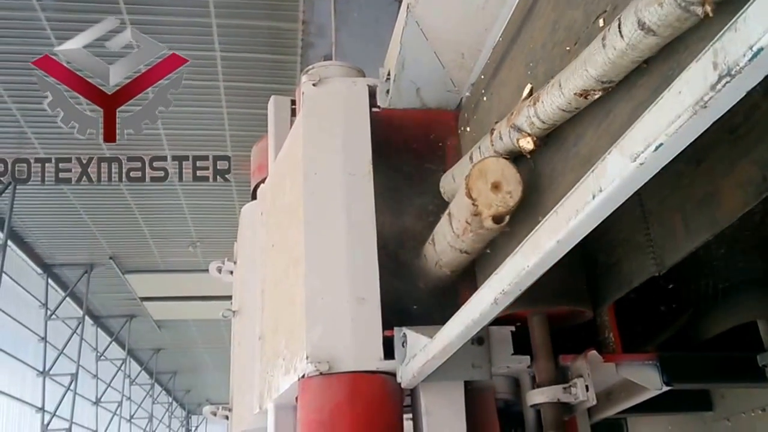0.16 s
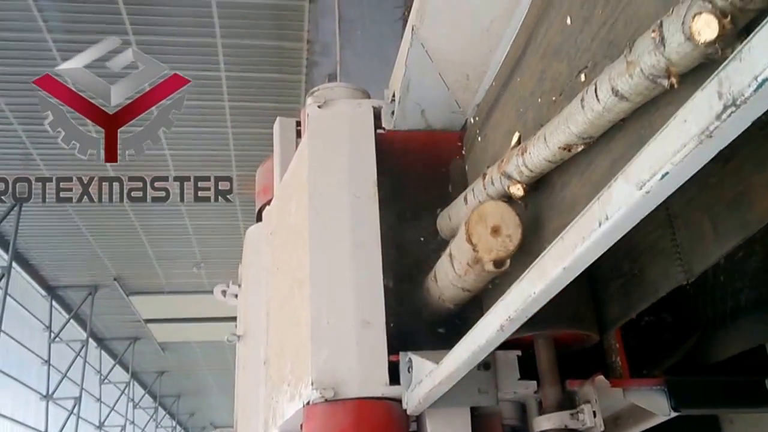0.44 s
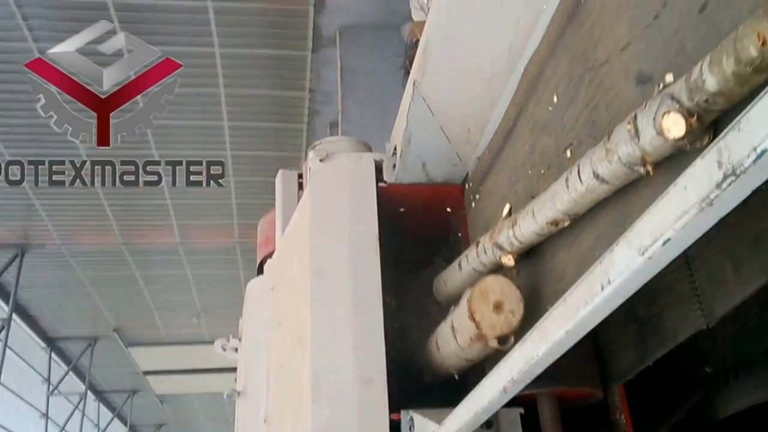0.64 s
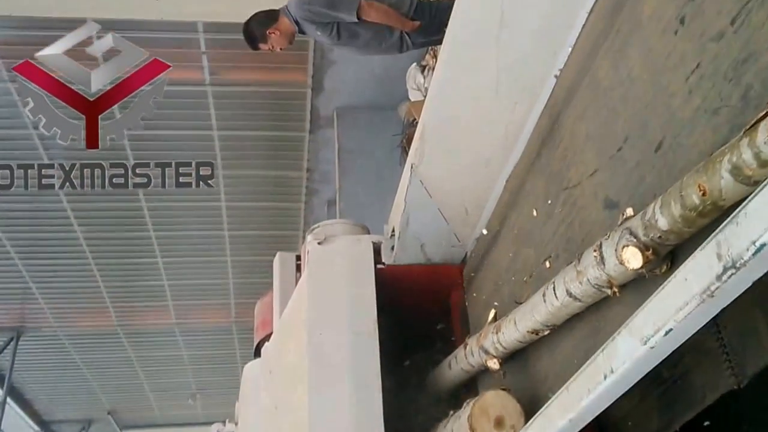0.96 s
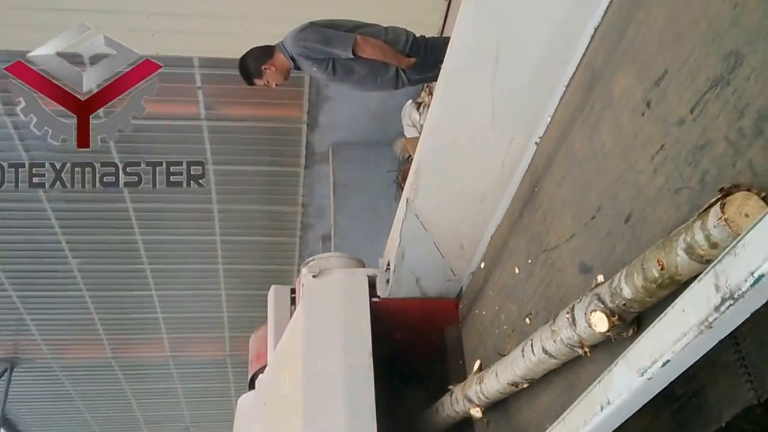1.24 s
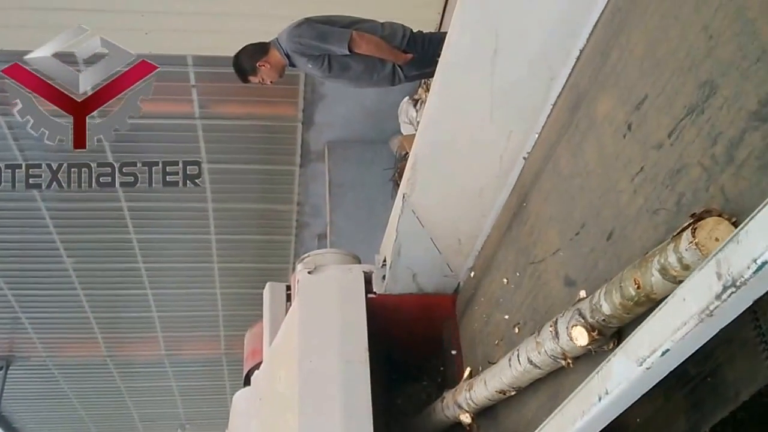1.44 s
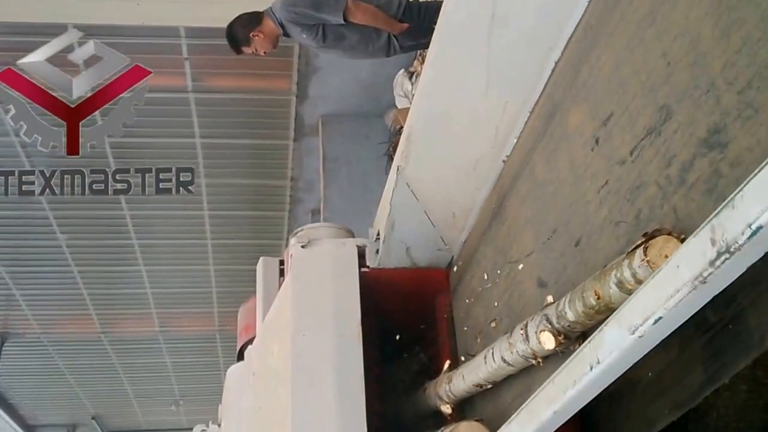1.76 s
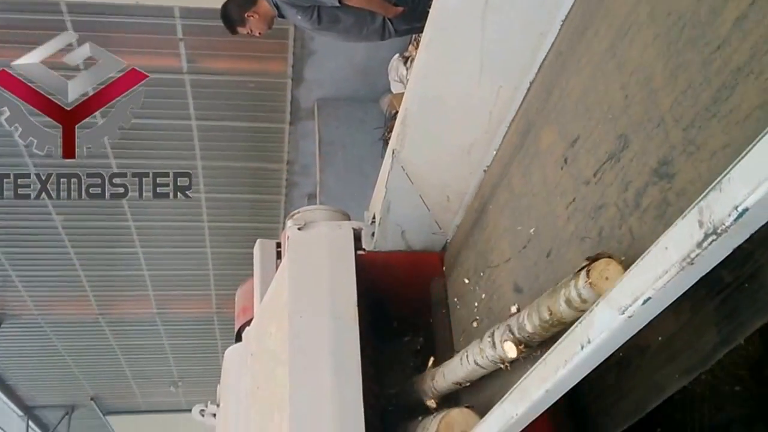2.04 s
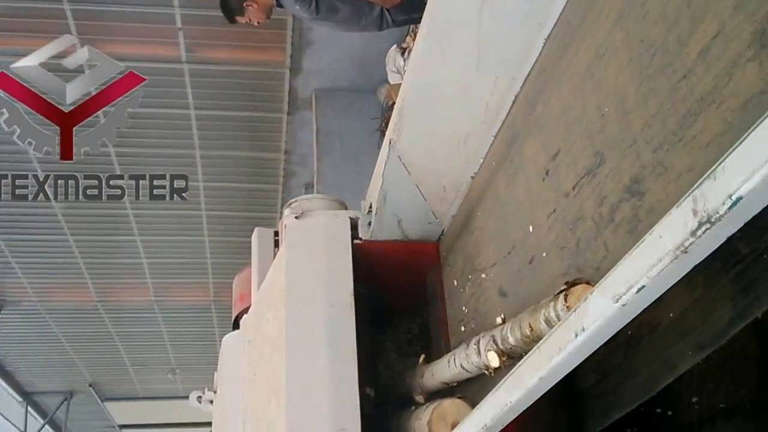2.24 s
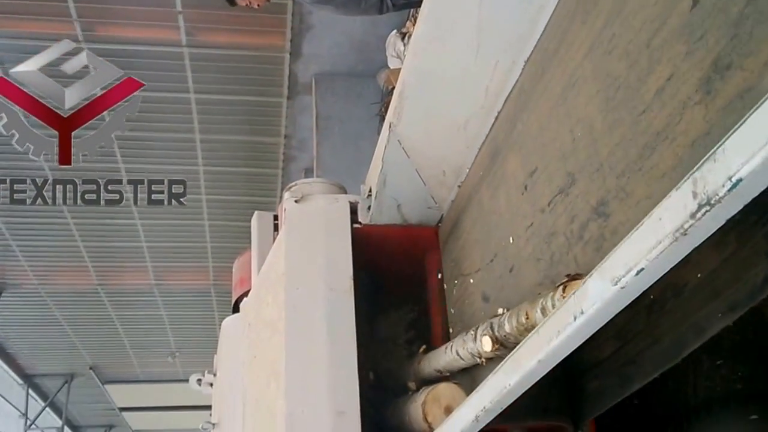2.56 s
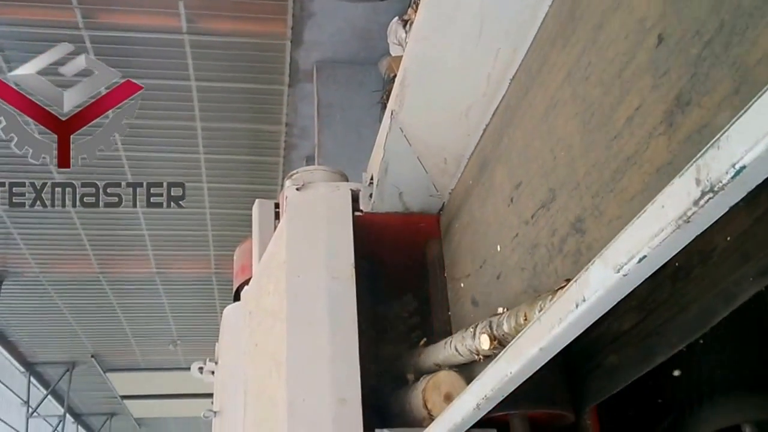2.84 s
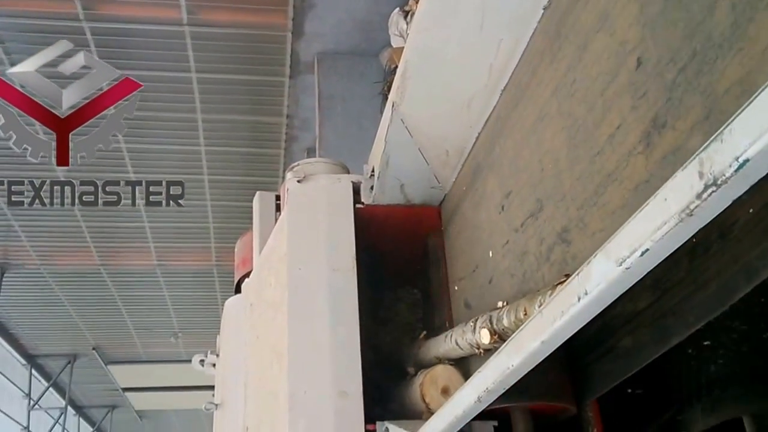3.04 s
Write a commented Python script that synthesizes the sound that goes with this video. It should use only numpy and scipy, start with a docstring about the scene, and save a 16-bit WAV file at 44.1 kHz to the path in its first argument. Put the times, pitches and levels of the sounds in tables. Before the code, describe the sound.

A large wood chipper is already grinding at 0 s and never stops until about 3.2 s. Rapid knife chatter, around 36 cuts a second, makes logs ring in wandering hollow tones over broad roar, low motor hum and hiss. Chip sprays rattle on steel about every tenth of a second; from 0.4 s logs knock dully, densest around 1.3-2 s. Close, treble-limited microphone, slight hall reverberation.

```python
"""A drum wood chipper in a large hall, heard through a small mono microphone whose response falls off steeply
above 7.75 kHz, with a flickering width in the treble. From the start logs ring as wandering resonances under
four knives a turn, over roar, motor hum and chip hiss (shaped noise and a sine). At once sprays of chips, dense
noise ticks, begin to strike steel; from about 0.4 s heavy knocks sound, short tone swells with dull cracks,
many of them once a drum turn. The logs stand well above the hall's answer."""
import sys
import numpy as np
from scipy import signal
from scipy.fft import rfft, irfft, next_fast_len
from scipy.io import wavfile
from scipy.ndimage import uniform_filter1d, map_coordinates

SR = 44100
rng = np.random.default_rng(int(sys.argv[2]) if len(sys.argv) > 2 else 0)


def store_pcm(level_fs):
    """Save levels as 16-bit WAV."""
    pcm = np.round(np.clip(level_fs, -1, 1) * 32767).astype(np.int16)
    wavfile.write(sys.argv[1], SR, np.atleast_2d(pcm).T)


N = 141561
T = np.arange(N) / SR


def amp(db):
    """dB to gain."""
    return 10 ** (np.asarray(db) / 20)


def unit(x):
    """Scale to rms 1."""
    return x / np.sqrt(np.mean(x ** 2) + 1e-20)


def level_curve(rows):
    """Straight lines through (time [s], level [dB]) rows, one value per sample."""
    times, levels = np.transpose(rows)
    return np.interp(T, times, levels)


def wobble(rate):
    """A smooth random curve, rate knots a second."""
    knots = rng.standard_normal(int(N * rate / SR) + 4)
    return map_coordinates(knots, [T * rate])


def patches(hz, t, size_hz, size_s):
    """A smooth random field over frequency and time."""
    knots = rng.standard_normal((120, 200))
    return map_coordinates(knots, np.meshgrid(hz / size_hz, t / size_s, indexing="ij"))


def coloured(x, points):
    """Filter x through a (frequency [Hz], gain [dB]) curve, interpolated over log frequency."""
    m = next_fast_len(N + 8192)
    f, db = np.transpose(points)
    gain = amp(np.interp(np.log(np.fft.rfftfreq(m, 1 / SR) + 1), np.log(f + 1), db))
    return irfft(rfft(x, m) * gain, m)[:N]


def decayed(x, t60):
    """Each impulse of x becomes an exponential tail that falls 60 dB in t60 seconds."""
    return signal.lfilter([1], [1, -amp(-60 / (t60 * SR))], x)


# bite of each knife around the drum: (relative level [dB])
KNIFE_BITES = [-5.5, -2, -1, 3.5]
TURN_HZ, FIRST_CUT_S = 9.045, 0.014  # drum turns a second, first knife
CUT_HZ = TURN_HZ * len(KNIFE_BITES)
BITE_SCATTER_DB, BITE_T60_S = 1.8, 0.035
TEAR_SHARE = 0.6  # steady tearing, against bursts of rms 1


def bites():
    """Knife force over time: a decaying burst at every cut, over steady tearing."""
    count = int(N / SR * CUT_HZ) - 1
    at = ((FIRST_CUT_S + np.arange(count) / CUT_HZ) * SR).astype(int)
    scatter = BITE_SCATTER_DB * rng.standard_normal(count)
    cuts = np.zeros(N)
    cuts[at] = amp(np.resize(KNIFE_BITES, count) + scatter)
    return unit(decayed(cuts, BITE_T60_S)) + TEAR_SHARE


RING_STEADY = 0.59  # how firmly the chatter holds its size (0-1)


def ring(hz, width_hz):
    """A noise-driven two-pole resonance: pitch may move, phase wanders, size is partly held."""
    turn = np.exp(2j * np.pi * np.cumsum(hz) / SR)
    pole = [1, -np.exp(-np.pi * width_hz / SR)]
    # the noise is turned down to 0 Hz, smoothed there, then turned back up to the moving pitch
    z = signal.lfilter([1], np.convolve(pole, pole), rng.standard_normal(len(hz)) / turn)
    held = z / (abs(z) + 1e-9) ** np.clip(RING_STEADY, 0, 1)
    return unit((turn * held).real)


# stretches in which a log or trough panel rings under the knives, level before the knife force:
# (time [s], length [s], first pitch [Hz], last pitch [Hz], width of each pole [Hz], level [dB])
LOG_RINGS = [(0, 0.7, 595, 621, 58.8, -25.5), (0, 1.3, 212, 205.6, 70.2, -29), (0, 0.64, 288, 294, 59, -28),
             (0, 0.26, 368, 380, 69.5, -35.5), (0.322, 0.25, 614, 606, 30, -21),
             (0.703, 0.65, 678, 670, 94, -24), (0.701, 0.32, 647, 610, 70, -29.5),
             (0.757, 0.83, 465, 492, 90.5, -28.5), (0.796, 0.52, 314, 336, 69, -28.5),
             (1.269, 1.2, 303.3, 317, 57.9, -20.5), (1.343, 1.05, 200, 200, 160.6, -29.5),
             (1.355, 0.67, 255, 272.6, 59.4, -27), (1.35, 0.42, 525, 513, 69.5, -26),
             (1.359, 0.63, 626, 590, 103, -26.5), (1.389, 0.8, 846, 913, 700, -25),
             (1.42, 0.46, 169, 164.7, 83, -29), (1.524, 0.45, 417, 411, 71, -29),
             (1.639, 0.78, 816, 735, 149, -25), (1.945, 1.1, 590, 589, 45, -23.5),
             (2, 0.24, 515, 492, 90.3, -24.5), (2.452, 0.87, 315, 329, 65, -24.5),
             (2.801, .45, 632, 700, 110, -24.5), (2.908, 0.53, 358, 383, 68.3, -22.5),
             (2.893, 0.28, 978, 940, 70, -29.5)]
RING_FADE_S = 0.1  # centred on each end of a stretch
RING_BEAT_T60_S = 0.026  # smoothing of the knife beat, applied twice


def logs():
    """Wood and panels ring under the knives, each while the log rests that way."""
    out = np.zeros(N)
    force = unit(decayed(decayed(bites(), RING_BEAT_T60_S), RING_BEAT_T60_S))
    for start, length, hz0, hz1, width_hz, db in LOG_RINGS:
        end = start + length
        fade = np.clip(np.minimum(T - start, end - T) / RING_FADE_S + 0.5, 0, 1)
        on = fade > 0
        pitch = np.interp(T[on], [start, end], [hz0, hz1])
        out[on] += amp(db) * (fade * force)[on] * ring(pitch, width_hz)
    return out


# load on the drum, before the roar gain: (time [s], level [dB])
DRUM_LOAD = [(0.0, -22), (0.24, -20.5), (0.62, -24.5), (0.85, -20), (0.9, -22.5), (0.95, -18.5), (1.0, -23),
             (1.15, -20.5), (1.19, -22.5), (2.14, -22.5), (2.25, -24.5), (2.27, -20.5), (2.72, -23),
             (2.82, -20), (2.96, -23.5), (3.13, -23.5), (3.14, -21), (3.21, -19.5)]
# spectrum of the roar: (frequency [Hz], relative level [dB])
ROAR_SPECTRUM = [(30, -38), (55, -26.5), (75, -10.5), (90, -18), (120, -4), (200, -4.5), (300, -1),
                 (650, -1.5), (880, -6), (1100, -10.5), (1520, -11), (1730, -16), (2060, -14.5),
                 (2450, -21), (3000, -18.5), (5500, -21.5), (7150, -34.5), (9000, -120)]
ROAR_GAIN_DB, ROAR_BEAT_DB = 4, 1  # over the load; swing at the knife rate
ROAR_PATCH_DB, ROAR_PATCH_HZ, ROAR_PATCH_S = 1.29, 495, 0.07  # uneven grinding: depth, patch size


def roar():
    """The housing's roar: broad noise, uneven in frequency and time, beating with the knives."""
    beat = np.cos(2 * np.pi * CUT_HZ * (T - FIRST_CUT_S - 0.004))  # peaks 4 ms after each cut
    hz, t, z = signal.stft(rng.standard_normal(N), SR, nperseg=512)
    uneven = amp(ROAR_PATCH_DB * patches(hz, t, ROAR_PATCH_HZ, ROAR_PATCH_S))
    grind = signal.istft(z * uneven, SR, nperseg=512)[1][:N]
    level = level_curve(DRUM_LOAD) + ROAR_GAIN_DB + ROAR_BEAT_DB * beat
    return amp(level) * unit(coloured(grind, ROAR_SPECTRUM))


# motor hum, before a small gain and wobble: (time [s], level [dB])
HUM_LEVEL = [(0.0, -25), (0.03, -28), (0.65, -31), (0.68, -40), (0.84, -24), (1.34, -29.5), (1.4, -27.5),
             (1.64, -23), (1.68, -47.5), (1.72, -30.5), (2.18, -25), (2.23, -43), (2.38, -29),
             (2.61, -35.5), (2.82, -29.5), (3.21, -31.5)]
HUM_HZ, HUM_WANDER_RAD = 99.3, 0.36


def hum():
    """The motor's hum: one sine whose phase and level wander."""
    phase = 2 * np.pi * HUM_HZ * T + HUM_WANDER_RAD * wobble(3.4)
    level = level_curve(HUM_LEVEL) + 0.46 + 0.56 * wobble(18)
    return amp(level) * np.sqrt(2) * np.sin(phase)


# steady chip hiss, before its gain and wobble: (time [s], level [dB])
HISS_LEVEL = [(0.0, -18.5), (0.08, -19), (0.61, -22), (0.98, -21.5), (1.26, -19.5), (1.61, -22.5),
              (1.96, -24.5), (2.3, -20), (2.7, -24), (2.86, -20), (2.97, -19.5), (3.03, -19.5),
              (3.21, -20.5)]
# spectrum of the hiss: (frequency [Hz], relative level [dB])
HISS_SPECTRUM = [(1500, -31), (3000, -14), (4000, -10.5), (5080, -9.5), (6970, -1.5), (7280, -0.5),
                 (7580, -8.5), (7850, -24.5), (8120, -45), (8400, -91), (10900, -120), (18500, -120)]


def chip_hiss():
    """Chips too dense to tell apart: smooth coloured noise."""
    hiss = unit(coloured(rng.standard_normal(N), HISS_SPECTRUM))
    level = level_curve(HISS_LEVEL) - 3.5 + 0.89 * wobble(25.16)
    return amp(level) * hiss


# chip sprays on the steel, before the shared gain: (time [s], level [dB])
CHIP_SPRAYS = [(0.0074, -6.5), (0.048, -24), (0.2023, -6.5), (0.3446, -5), (0.4514, -6), (0.538, -10),
               (0.642, -13), (0.7847, -1.5), (0.894, -1.5), (0.926, -19.5), (0.941, -14.5), (1.009, -9),
               (1.094, -7), (1.1156, -14), (1.195, -7.5), (1.2262, -8), (1.313, -7.5), (1.45, -6),
               (1.559, -21), (1.671, -7.5), (1.781, -8), (1.89, -6.5), (2.0003, -6.5), (2.028, -12),
               (2.0955, -14), (2.1174, -7), (2.2212, -10.5), (2.327, -21.5), (2.359, -8.5), (2.4454, -10),
               (2.5286, -2), (2.5784, -8), (2.6664, -9), (2.7729, -1.5), (2.801, -20), (2.8834, -4.5),
               (2.9087, -14.5), (2.9937, 1), (3.081, -10.5), (3.106, -2.5), (3.1997, -6.5)]
# spectrum of chips striking steel: (frequency [Hz], relative level [dB])
STEEL_SPECTRUM = [(2500, -49.5), (3500, -16), (4300, -10), (5140, -13), (6520, 0), (7180, 4), (7580, -4),
                  (7840, -19), (8400, -74), (11000, -120)]
SPRAY_GAIN_DB, SPRAY_LEAD_S = -7, 0.0024  # a swell starts this long before its listed time
SPRAY_RISE_S, SPRAY_T60_S = 0.0031, 0.043  # the rise is a time constant
SPRAY_TAIL_DB, SPRAY_TAIL_T60_S = -8.5, 0.25
CHIPS_PER_S, CHIP_SPREAD_DB, CHIP_T60_S = 8000, 1.5, 0.002


def chip_sprays():
    """Dense random chip ticks, swelling fast and dying in two slopes at each spray."""
    starts = np.zeros(N)
    times, levels = np.transpose(CHIP_SPRAYS)
    starts[((times - SPRAY_LEAD_S) * SR).astype(int)] = amp(levels + SPRAY_GAIN_DB)
    tail = amp(SPRAY_TAIL_DB)
    swell = decayed(starts, SPRAY_T60_S) + tail * decayed(starts, SPRAY_TAIL_T60_S)
    # taking away a fast decay makes the swell rise from zero
    swell -= (1 + tail) * decayed(starts, SPRAY_RISE_S * np.log(1000))
    hits = (rng.random(N) < CHIPS_PER_S / SR) * amp(CHIP_SPREAD_DB * rng.exponential(size=N))
    ticks = decayed(hits, CHIP_T60_S) * rng.standard_normal(N)
    return swell * unit(coloured(ticks, STEEL_SPECTRUM))


# heavy knocks, many once a drum turn, before the shared gain: (time [s], level [dB], pitch [Hz])
HEAVY_KNOCKS = [(0.419, -3.5, 627), (0.68, -11, 667), (0.763, -5, 662), (0.876, -6.5, 576),
                (0.959, 0.5, 660), (1.069, -3, 655), (1.181, -8, 673), (1.289, -8, 627), (1.32, -8, 292),
                (1.372, -1, 299), (1.417, -13, 178.4), (1.426, -5, 530), (1.499, -8.5, 182),
                (1.618, -7.5, 163.5), (1.722, -7, 174), (1.829, -11.5, 184), (1.459, -8, 329),
                (1.51, -13.5, 266), (1.57, -9.5, 309), (1.649, -6, 286), (1.676, -6, 310),
                (1.755, -6, 308), (1.81, -4, 292), (1.901, -6.5, 284), (1.981, 0.5, 337),
                (2.091, -12.5, 308), (2.173, -13, 309), (2.281, -5, 733), (2.309, -10, 602),
                (2.421, -9, 588), (2.616, -6.5, 582), (2.847, -8, 599), (2.956, -9.5, 639),
                (3.059, -4, 669), (3.168, -5.5, 625)]
KNOCK_GAIN_DB, KNOCK_LEAD_S = -6.5, 0.00514  # a knock starts this long before its listed time
KNOCK_LENGTH_S, KNOCK_LENGTH_HZ = 0.025, 480  # length at this pitch; lower knocks last longer
KNOCK_CRACK_DB, KNOCK_CRACK_T60_S = -6, 0.015


def knocks():
    """Soft wooden blows, each a short swell of one tone with a dull noise crack."""
    out, t = np.zeros(N + SR), T[:SR // 10]
    for s, db, hz in HEAVY_KNOCKS:
        length = KNOCK_LENGTH_S * np.sqrt(KNOCK_LENGTH_HZ / hz)
        tone = np.sin(2 * np.pi * hz * t + rng.uniform(0, 2 * np.pi))
        swell = np.sin(np.pi * np.minimum(t / length, 1)) * tone
        dull_noise = uniform_filter1d(rng.standard_normal(len(t)), size=12)
        crack = dull_noise * amp(KNOCK_CRACK_DB - 60 * t / KNOCK_CRACK_T60_S)
        start = round((s - KNOCK_LEAD_S) * SR)
        out[start:][:len(t)] += amp(db + KNOCK_GAIN_DB) * (swell + crack)
    return out[:N]


HALL_T60_S, HALL_DB = 0.6, -11


def hall(x):
    """The hall's diffuse answer: x convolved with half a second of decaying noise."""
    tail = rng.standard_normal(SR // 2) * amp(-60 * T[:SR // 2] / HALL_T60_S)
    answer = signal.fftconvolve(x, tail / np.linalg.norm(tail))[:N]
    return x + amp(HALL_DB) * answer


def scene():
    """Everything reaches one microphone; only the logs and knocks excite the hall."""
    mono = hall(logs() + knocks()) + roar() + hum() + chip_hiss() + chip_sprays()
    return np.array([mono, mono])


# microphone response: (frequency [Hz], gain [dB])
MIC_RESPONSE = [(30, -17), (90, -1), (7750, 0), (8000, -10), (8800, -25)]
# how far the treble spreads to the sides: (frequency [Hz], side gain [dB])
SIDE_WIDTH = [(3700, -100), (4300, -35.5), (5200, -14), (6500, -2.5), (7500, -13), (7800, -26)]
CEILING, KNEE = 0.75, 4  # overload amplitude and sharpness
FLICKER_DB, FLICKER_HZ, FLICKER_S = 15, 1085, 0.035  # flicker of the treble's width: depth, patch size
TOP_HZ = 8800


def record(dry):
    """Soft overload, microphone colour, a flickering treble spread, band limit."""
    limited = dry[0] / (1 + abs(dry[0] / CEILING) ** KNEE) ** (1 / KNEE)
    mid = coloured(limited, MIC_RESPONSE)
    hz, t, z = signal.stft(mid, SR, nperseg=512)
    flicker = unit(amp(FLICKER_DB * np.tanh(2 * patches(hz, t, FLICKER_HZ, FLICKER_S))))
    random_phase = np.exp(2j * np.pi * rng.random(z.shape))
    spread = signal.istft(z * flicker * random_phase, SR, nperseg=512)[1][:N]
    side = coloured(spread, SIDE_WIDTH)
    m = next_fast_len(N + SR // 4)
    below_top = np.fft.rfftfreq(m, 1 / SR) < TOP_HZ
    return irfft(rfft([mid + side, mid - side], m) * below_top, m)[:, :N]


dry = scene()
out = record(dry)
store_pcm(out)
```